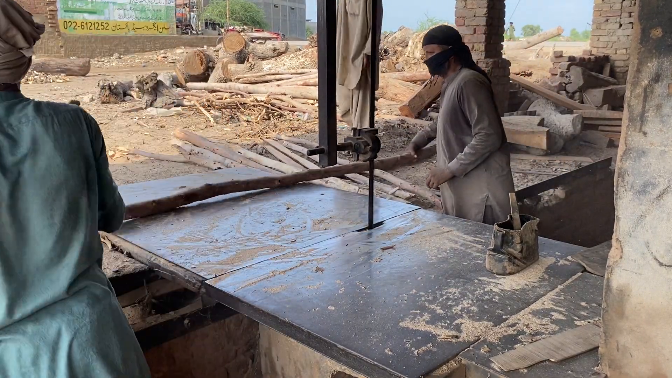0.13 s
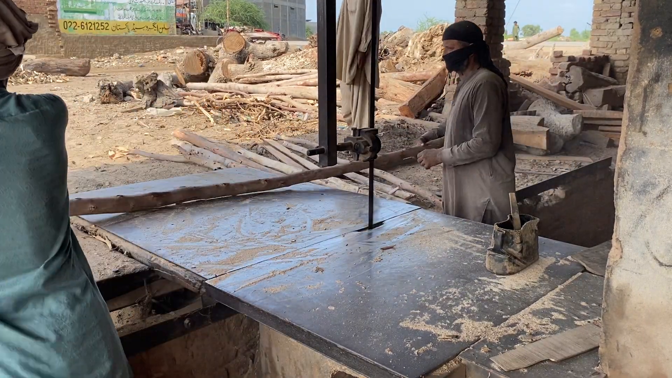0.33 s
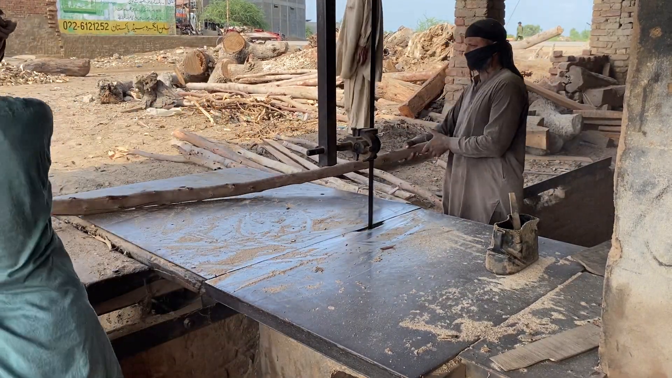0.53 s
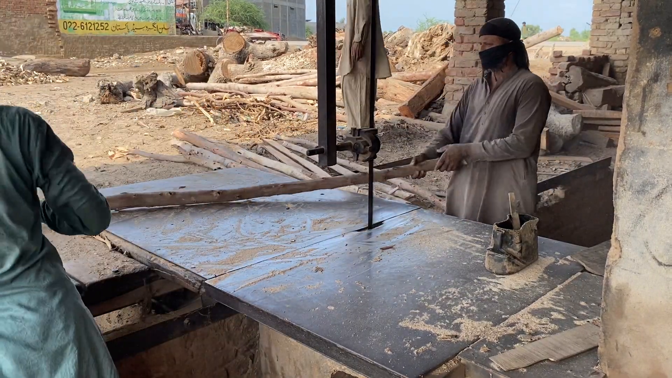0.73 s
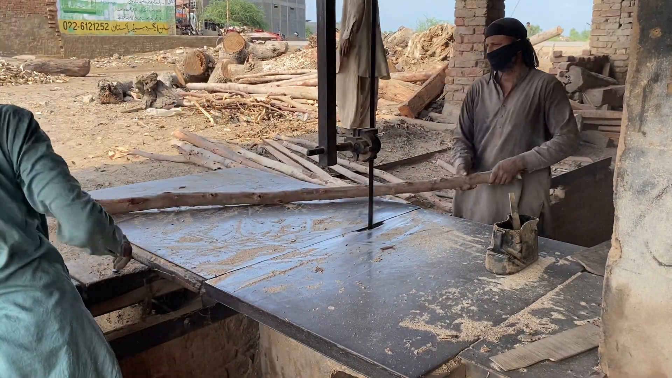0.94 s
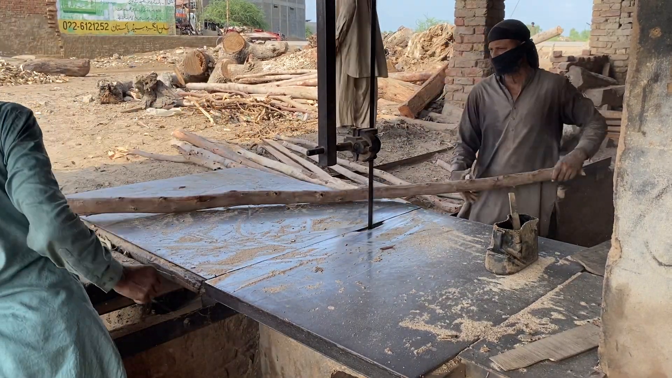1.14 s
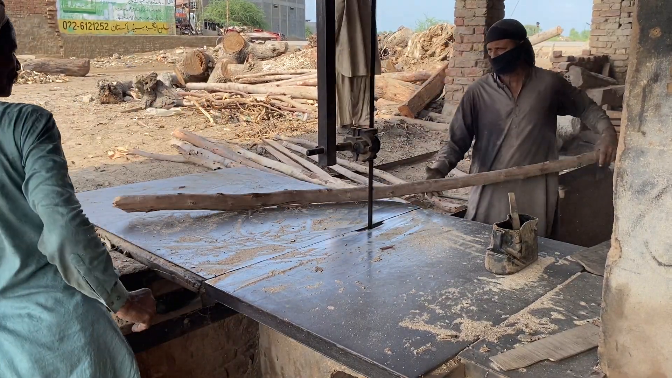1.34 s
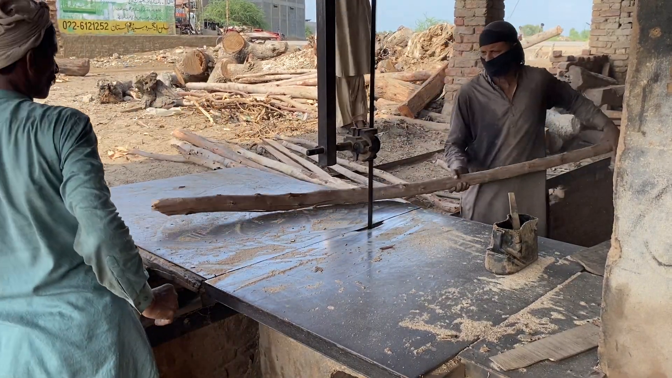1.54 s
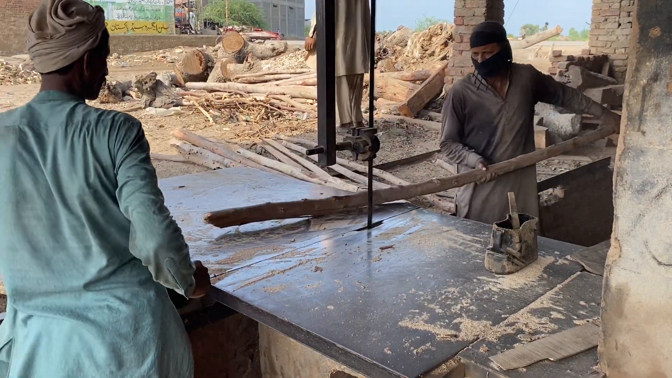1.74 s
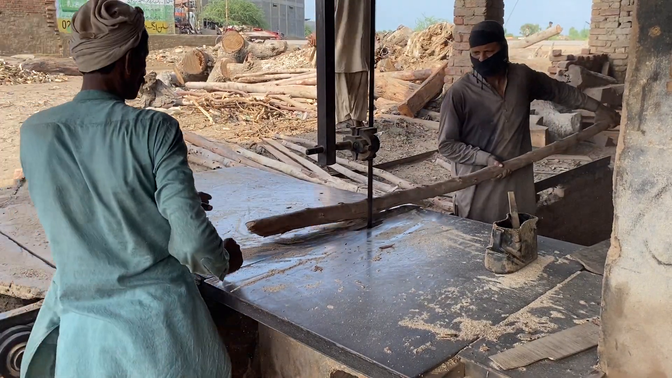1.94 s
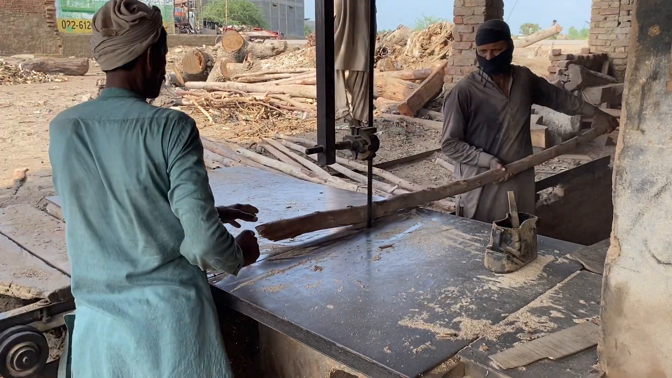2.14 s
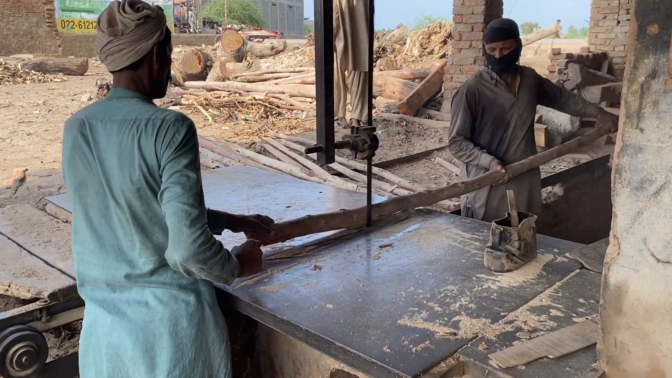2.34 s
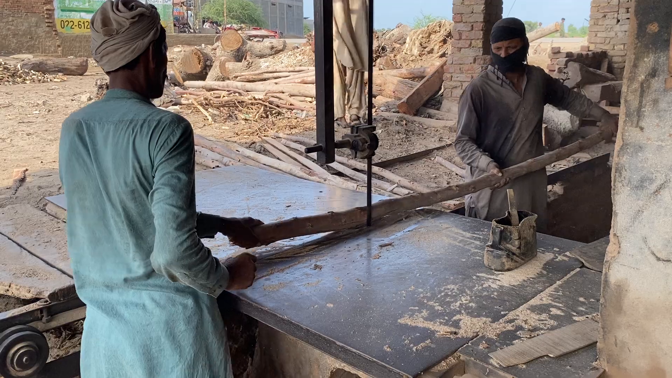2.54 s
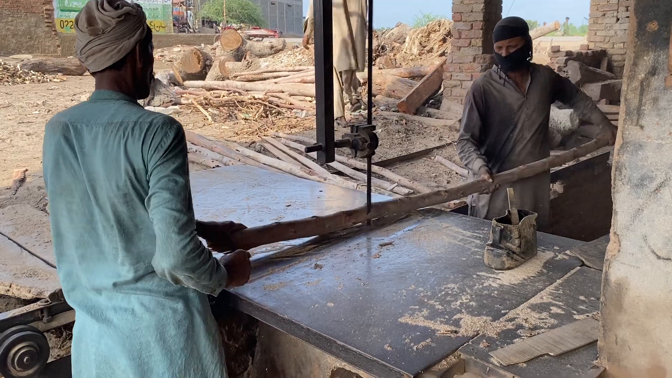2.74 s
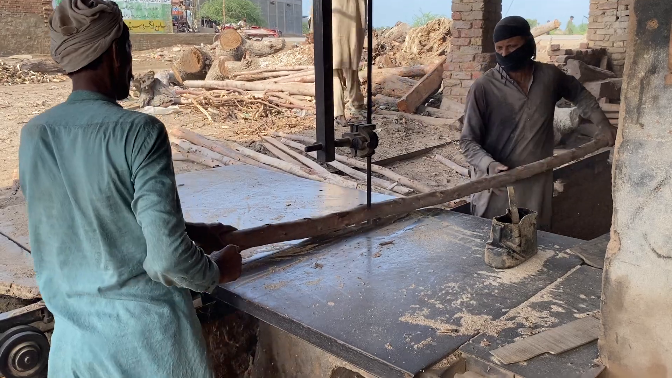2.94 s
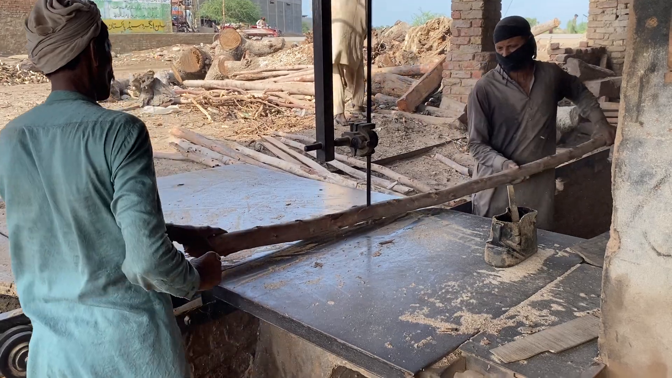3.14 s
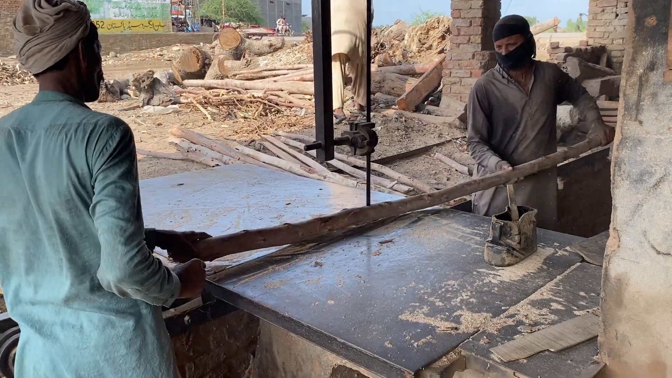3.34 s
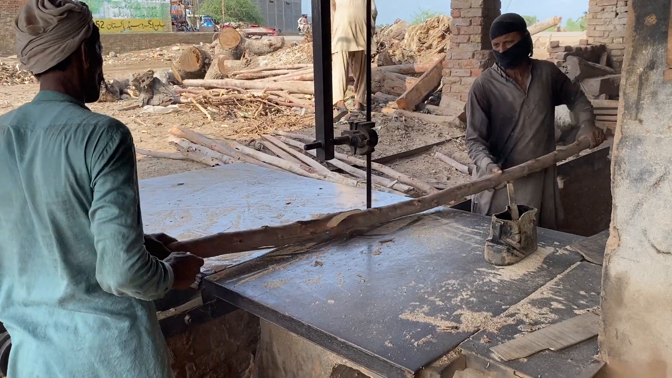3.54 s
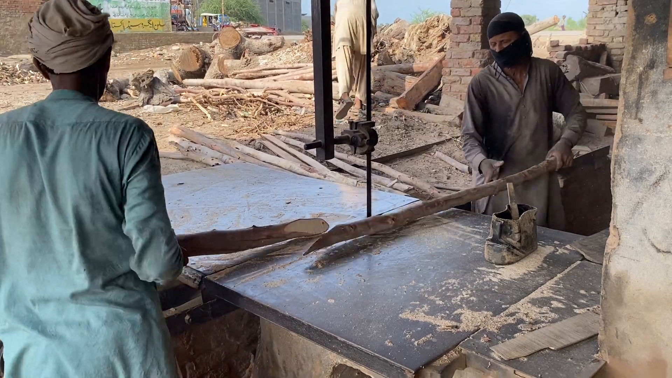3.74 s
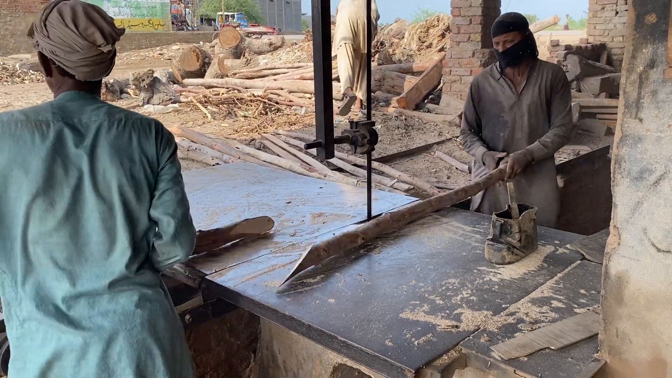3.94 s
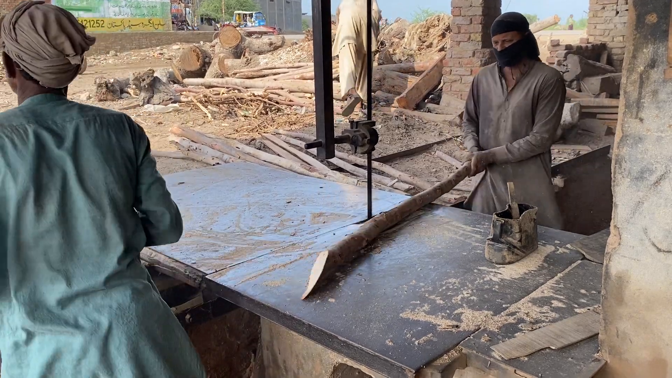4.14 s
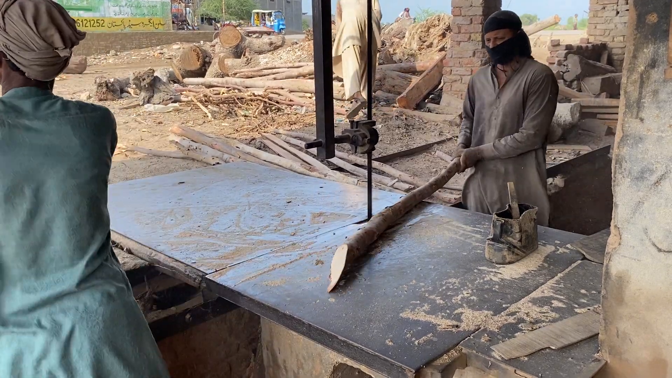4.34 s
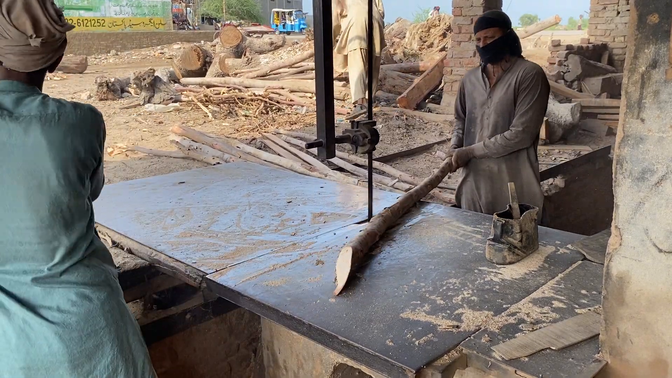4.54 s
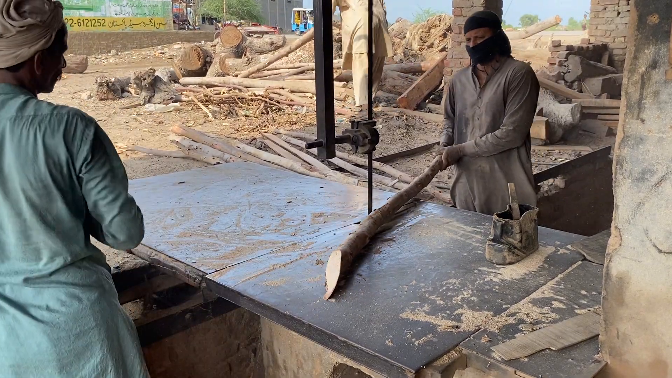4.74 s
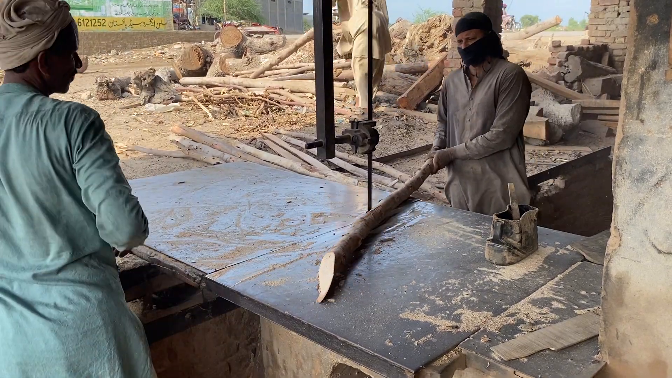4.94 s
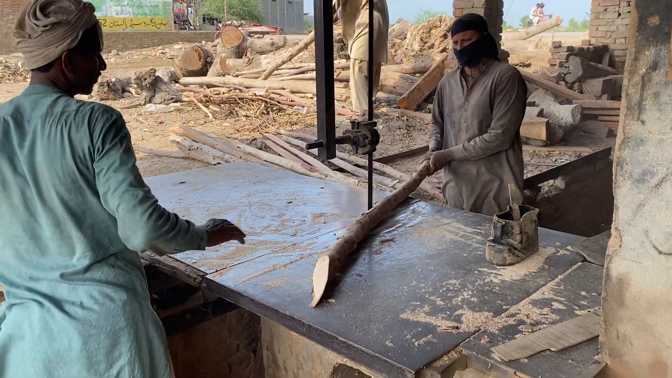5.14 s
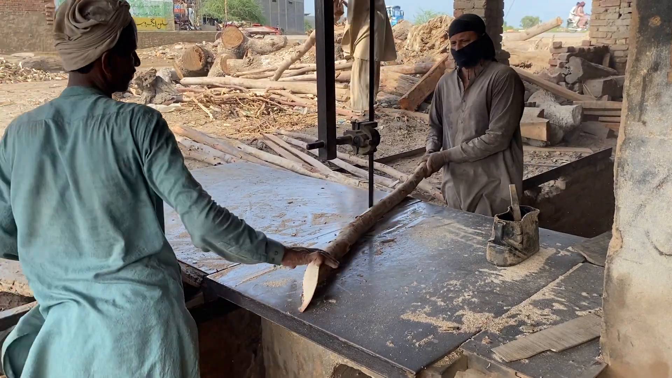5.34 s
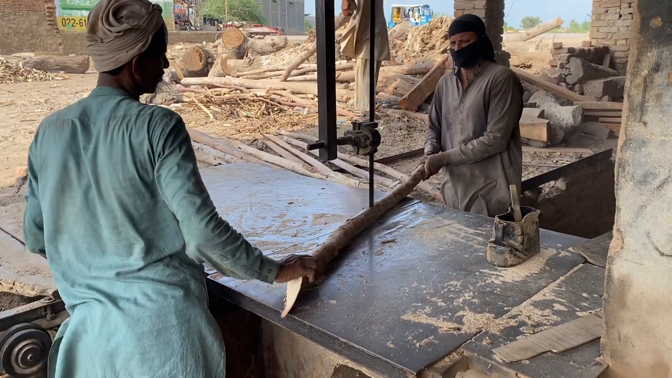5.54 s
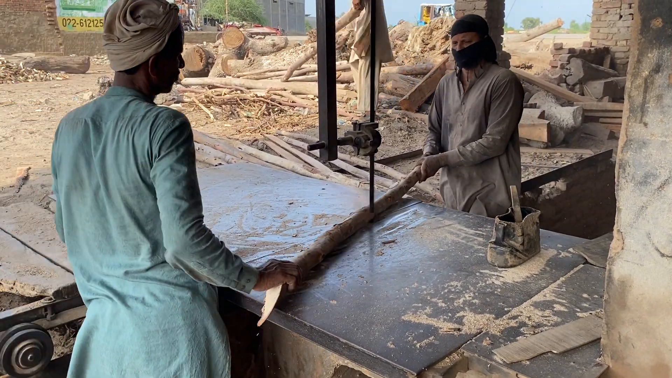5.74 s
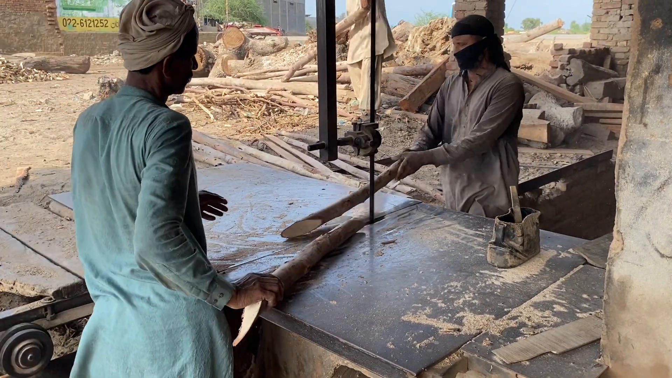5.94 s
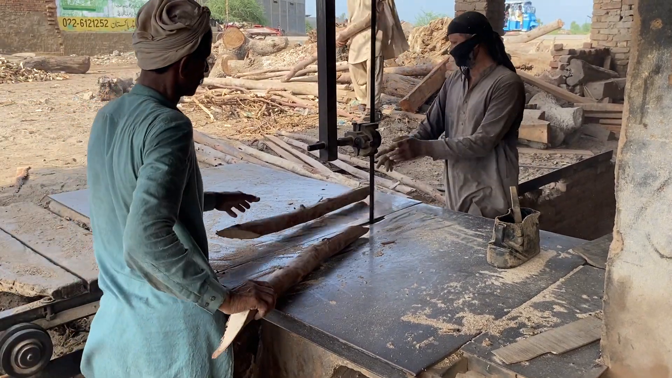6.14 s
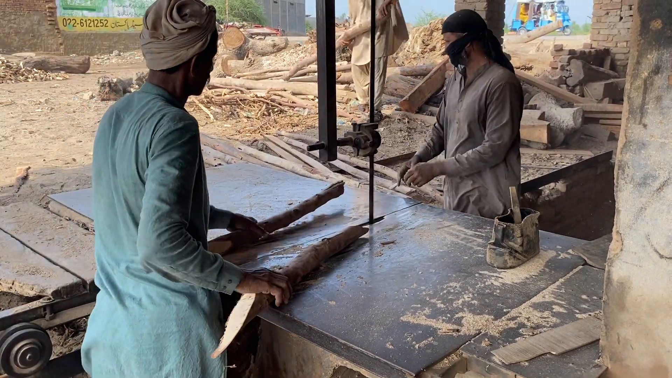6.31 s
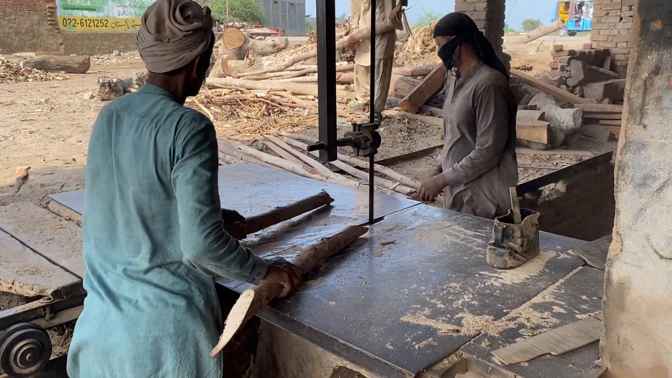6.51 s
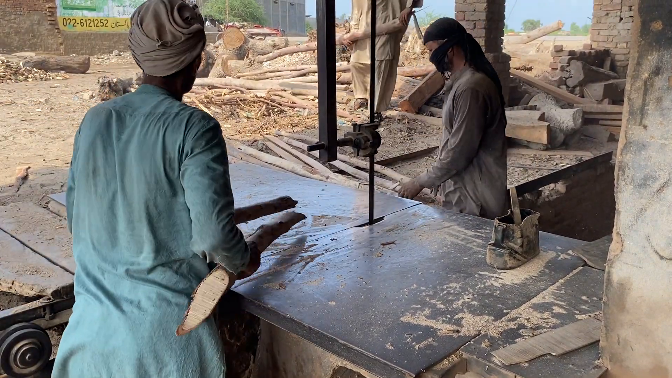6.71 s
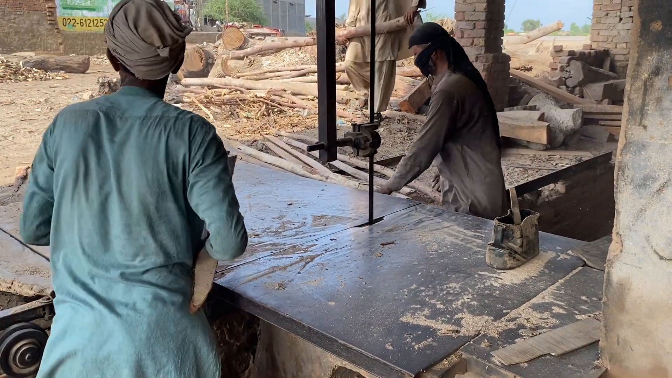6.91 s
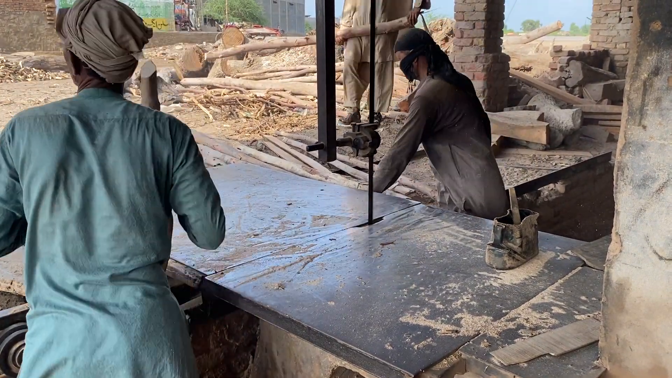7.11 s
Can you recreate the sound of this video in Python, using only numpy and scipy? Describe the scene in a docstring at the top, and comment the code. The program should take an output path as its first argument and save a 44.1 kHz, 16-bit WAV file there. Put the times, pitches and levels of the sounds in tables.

```python
"""A low rumble, a hiss and a thin whine: a band saw idles under the roof of an open sawmill.
Its wheels rumble, a bearing whines, and the blade hisses through its guides and pings once a turn.
Now and then timber knocks on the steel table. Twice a pole is pushed through: the blade screams,
wood rasps and sprays, teeth sing at their passing rate and the pole thrums on the table.
The two microphone ports hear the treble with a delay between them."""
import sys
import numpy as np
from scipy import signal
from scipy.fft import rfft, irfft, next_fast_len
from scipy.io import wavfile
from scipy.ndimage import uniform_filter1d, map_coordinates

SR = 44100
rng = np.random.default_rng(int(sys.argv[2]) if len(sys.argv) > 2 else 0)


def wrap_up_sound(samples):
    """Save the sound to the file named by the first command line argument, as 16-bit audio."""
    columns = np.atleast_2d(samples).T
    # keep every value between -1 and 1, then stretch to whole-number steps
    tamed = np.clip(columns, -1, 1)
    steps = np.round(tamed * 32767).astype(np.int16)
    wavfile.write(sys.argv[1], SR, steps)


N = 316197
TIME_S = np.arange(N) / SR
TURN_HZ = 4.409  # wheel rotation


def amp(db):
    """dB to gain."""
    return 10 ** (np.asarray(db) / 20)


def unit(x):
    """Scale to rms 1."""
    return x / np.sqrt(np.mean(x ** 2) + 1e-20)


def along(points, hz):
    """Interpolate (f/Hz, value) points on a log frequency axis."""
    f, v = np.transpose(points)
    return np.interp(np.log(hz + 1), np.log(f + 1), v)


def curves(*tables):
    """A gate, open within each table's time span, then each value column per sample."""
    times, *columns = np.transpose(np.vstack(tables))
    inside_s = [np.minimum(TIME_S - rows[0][0], rows[-1][0] - TIME_S) for rows in tables]
    gate = sum(np.clip(s / 0.018, 0, 1) for s in inside_s)
    return [gate] + [np.interp(TIME_S, times, column) for column in columns]


def wobble(rate_hz):
    """Smooth random curve through normal knots at rate_hz."""
    return map_coordinates(rng.standard_normal(int(N * rate_hz / SR) + 4), [TIME_S * rate_hz])


def phase_of(hz):
    """Running phase in rad."""
    return 2 * np.pi * np.cumsum(hz) / SR


def filtered(x, response):
    """Apply a complex frequency response."""
    size = next_fast_len(N + SR // 2)
    return irfft(rfft(x, size) * response(np.fft.rfftfreq(size, 1 / SR)), size)[..., :N]


def rush(spectrum, patchy_db, slides=()):
    """Two independent patchy noises; each slide (turn fractions, ratios) shifts a spectrum copy."""
    hz, t, bins = signal.stft(rng.standard_normal((2, N)), SR, nperseg=512)
    patches = uniform_filter1d(rng.standard_normal(bins.shape[1:]), size=6, axis=0)
    patches = unit(uniform_filter1d(patches, size=8, axis=1))
    closed = [(spectrum[0][0] / 2, -120), *spectrum, (spectrum[-1][0] * 2, -120)]
    ratios = [np.interp(t * TURN_HZ % 1, *slide) for slide in slides] or [np.ones(1)]
    colour = sum(amp(along(closed, hz[:, None] / ratio)) for ratio in ratios)
    _, noise = signal.istft(bins * amp(patchy_db * patches) * colour, nperseg=512)
    return unit(noise[:, :N])


# Background, dipping after each cut and then recovering: t/s, background level/dB, whine level/dB
BACKGROUND = [(0, -35.5, -45.5), (.6, -35.5, -46.5), (.9, -35, -43.5), (1.25, -34.5, -53),
              (1.7, -34.5, -43), (1.95, -34.5, -48), (2.1, -34.5, -52), (3.05, -35, -39), (3.5, -36.5, -44),
              (3.8, -38, -50), (4.1, -38, -46), (4.25, -35, -45.5), (4.85, -36, -50.5),
              (5.12, -35.5, -36.5), (5.35, -34, -52), (5.6, -35.5, -56), (5.83, -36.5, -41),
              (5.92, -37.5, -57), (6.45, -36, -43.5), (7.17, -36, -55)]
USUAL_BACKGROUND_DB = -35.5


def background_offset_db():
    """Background level relative to its usual value."""
    _, background_db, _ = curves(BACKGROUND)
    return background_db - USUAL_BACKGROUND_DB


def bearing_whine():
    """A bearing whines on one wavering tone."""
    _, _, whine_db = curves(BACKGROUND)
    tone = np.sqrt(2) * np.sin(phase_of(1766 + 4 * wobble(20)))
    return amp(whine_db + 2.5 * wobble(14)) * tone * [[1], [.6]]


# Wheel rumble spectrum: f/Hz, relative density/dB
RUMBLE = [(15, -61), (25, -31), (34, -53), (47, -10), (92, -5), (123, -1), (167, -1), (199, -6.5),
          (247, -2), (503, -16.5), (549, -20), (800, -19.5), (1040, -15), (1760, -120)]
# Hum bands: f/Hz, width/Hz, relative level/dB
HUMS = [(123.3, 14.6, -43.5), (170.8, 4.8, -45.5), (71.9, 4.9, -47.5), (245, 15.4, -49.5), (889, 39, -48),
        (1640, 20, -50.5), (2044, 31, -46)]
RUMBLE_DB, HUMS_DB, RUMBLE_SWING_DB_PER_DB = -36, -41, 1.82


def wheel_rumble():
    """The wheels rumble with narrow hums; both follow the background level."""
    def bands(hz):
        return sum(amp(db) / np.sqrt(width) / (1 + 2j * (hz - centre) / width) ** 2
                   for centre, width, db in HUMS)
    rumble = unit(filtered(rng.standard_normal((2, N)), lambda hz: amp(along(RUMBLE, hz))))
    hums = unit(filtered(rng.standard_normal((2, N)), bands))
    swing = amp(RUMBLE_SWING_DB_PER_DB * background_offset_db())
    return swing * (amp(RUMBLE_DB) * rumble + amp(HUMS_DB) * hums)


# Frame and table resonances: f/Hz, relative density/dB
FRAME = [(320, -6.5), (550, -10), (741, -14.5), (925, 0), (1100, -12.5), (1250, -10.5), (1510, -7),
         (1800, 0), (1920, -2.5), (2100, -3.5), (2570, -5), (4950, -10.5), (5500, -9.5), (7150, -44),
         (12100, -120)]
FRAME_DB = -36


def frame_ring():
    """Frame and table ring as the saw runs."""
    return amp(FRAME_DB + background_offset_db() + 0.37 * wobble(8)) * rush(FRAME, patchy_db=1.0)


# Spectra of the free blade, the loaded blade and two narrow modes: f/Hz, relative density/dB
HISS = [(4500, -35), (5750, -11), (6050, -1.5), (6400, 1), (7300, -0.5), (8500, -4), (10000, -6.5),
        (12500, -6.5), (13500, -8.5), (13900, -5), (14600, -6), (17500, -5)]
SCREAM = [(4000, -13), (5750, -12.5), (6050, 0), (6400, -0.5), (7300, 1), (8500, -4.5), (10000, -8),
          (12500, -8), (13500, -11), (13900, -4.5), (14600, 1), (17500, -22.5)]
BLADE_MODES = [(5800, -30), (5930, 0), (6070, 0), (6200, -30), (13500, -30), (13850, -2.5), (14150, -2.5),
               (14500, -30)]
# Slide of the blade's cross modes: position/turn, falling pitch ratio, rising pitch ratio
MODE_SLIDE = [(0, 1, 1.07), (.1, 1, 1.06), (.3, .99, 1), (.42, .975, .975), (.54, .955, .99), (.6, .905, 1),
              (.67, .905, 1.015), (.77, 1, 1.035), (1, 1, 1.07)]
# One table per cut: t/s, scream level/dB, chip level/dB, rasp level/dB, wood resonance f/Hz
CUTS = [
    [(2.26, -40, -48, -54, 2500), (2.316, -25.5, -36, -26, 2490), (2.385, -34, -45, -42, 2600),
     (2.43, -21.5, -37, -28.5, 2470), (2.584, -23, -38, -30, 2360), (2.66, -22, -21, -24.5, 3030),
     (2.74, -19, -35, -26.5, 3730), (2.79, -25, -25, -30, 2000), (2.85, -23, -22, -25.5, 1300),
     (2.96, -22, -26, -26.5, 1340), (3.066, -22, -21.5, -26, 1800), (3.13, -23.5, -24, -27.5, 1900),
     (3.16, -26, -25.5, -28, 1900), (3.35, -25, -27, -30, 2320), (3.43, -26.5, -30, -28.5, 2300),
     (3.5, -27, -25, -27, 2160), (3.55, -36, -48, -62, 2300)],
    [(4.9, -49, -46, -43, 1900), (4.945, -22.5, -30, -36.5, 1900), (5.058, -22.5, -24.5, -33.5, 2100),
     (5.3, -24.5, -24.5, -33, 2070), (5.5, -24.5, -28, -32.5, 1720), (5.634, -28.5, -28, -35, 1800),
     (5.72, -28, -25.5, -37, 2500), (5.754, -23, -27, -27, 2200), (5.8, -31.5, -40, -57, 2900),
     (5.85, -32, -42, -55, 2900)],
]
HISS_DB, HISS_SWING_DB_PER_DB = -30, 0.62


def blade(chatter_db):
    """The blade hisses in its guides and screams in the wood; its modes slide once a wheel turn."""
    turn, falling, rising = np.transpose(MODE_SLIDE)
    gate, scream_db, *_ = curves(*CUTS)
    free = amp(HISS_DB + HISS_SWING_DB_PER_DB * background_offset_db() + 0.54 * wobble(15))
    loaded = gate * amp(scream_db + chatter_db)
    broad_slide = [(turn, 1 + .7 * (falling - 1))]
    hiss = free * rush(HISS, patchy_db=1.7, slides=broad_slide)
    scream = loaded * rush(SCREAM, patchy_db=0.94, slides=broad_slide)
    modes = rush(BLADE_MODES, patchy_db=1.5, slides=[(turn, falling), (turn, rising)])
    return hiss + scream + amp(-9) * np.hypot(free, loaded) * modes


PING_HZ, PING_AT_TURN, PING_HALF_WIDTH_S, PING_DB = 5400, .68, .014, -45


def blade_ping():
    """The blade pings once a wheel turn, at a varying level."""
    from_peak_s = (TIME_S * TURN_HZ % 1 - PING_AT_TURN) / TURN_HZ
    pulse = np.exp(-(from_peak_s / PING_HALF_WIDTH_S) ** 2)
    tone = np.sqrt(2) * np.sin(phase_of(PING_HZ + 60 * wobble(120)))
    return amp(PING_DB + background_offset_db() + 3 * wobble(TURN_HZ)) * pulse * tone * [[1], [.4]]


# Blows: t/s, level/dB, favoured f/Hz
KNOCKS = [(.814, -21.5, 780), (.835, -21, 1860), (.842, -24.5, 1060), (.86, -34, 483), (.909, -26, 1060),
          (0.923, -31.5, 560), (6.142, -29, 500), (6.159, -26, 930), (6.249, -38, 398)]
# Timber modes: f/Hz, relative level/dB, T60/s
TIMBER_MODES = [(257, 2, 0.11), (422, 4.5, 0.14), (560, 3, 0.079), (782, -4.5, 0.15), (1048, -2, 0.082),
                (1390, -11, .06), (1800, -3, 0.043), (1920, 5, 0.035), (2330, -11, .04), (2750, 11, .04)]


def timber_knocks():
    """Timber drops on the table: each blow favours the modes near one pitch, over a dull clatter."""
    out, t = np.zeros((2, N + SR)), np.arange(SR // 4) / SR
    attack = 1 - np.exp(-t / 0.0017)
    for start_s, blow_db, favoured_hz in KNOCKS:
        ring = 0
        for hz, mode_db, t60 in TIMBER_MODES:
            level_db = mode_db - 33 * abs(np.log2(hz / favoured_hz)) - 60 * t / t60
            ring += amp(level_db) * np.sin(2 * np.pi * (hz * t + rng.random()))
        noise = uniform_filter1d(rng.standard_normal((2, len(t))), size=5)
        clatter = 1.5 * amp(-60 * t / 0.2) * uniform_filter1d(noise, size=int(SR / 2.5 / favoured_hz))
        start = round(start_s * SR)
        out[:, start:start + len(t)] += amp(blow_db) * attack * (ring * [[1], [.5]] + clatter)
    return out[:, :N]


# Spectra of the chip spray and three rasp bands: f/Hz, relative density/dB
CHIPS = [(7000, -24), (8500, 1.5), (11000, -2), (13000, 0.5), (15800, 5)]
LOW_RASP = [(450, -8), (750, -5), (950, 2.5), (1100, 1.5), (1350, -0.5), (1500, 2.5), (1750, -38)]
MIDDLE_RASP = [(1300, -29), (1600, 0.5), (1900, -1.5), (2300, -4), (2600, -20)]
HIGH_RASP = [(1900, -12), (2400, 0.5), (3200, -1), (4000, -0.5), (5000, -3.5), (5800, -4.5)]
RASPS_HZ, RASPS_DB, RASP_LOSS_DB_PER_OCTAVE = (1090, 1900, 3270), (-3, -4, 1.5), 5.5


def chips_and_rasp(chatter_db):
    """Chips tear off in bursts; the wood rasps most near its resonance."""
    gate, _, chip_db, rasp_db, wood_hz = curves(*CUTS)
    out = amp(chip_db) * rush(CHIPS, patchy_db=3.5)
    for spectrum, hz, band_db in zip((LOW_RASP, MIDDLE_RASP, HIGH_RASP), RASPS_HZ, RASPS_DB):
        loss_db = RASP_LOSS_DB_PER_OCTAVE * abs(np.log2(hz / wood_hz))
        out += amp(rasp_db + band_db - loss_db) * rush(spectrum, patchy_db=3.5)
    return gate * amp(chatter_db) * out


# Tooth harmonics 1-6: level/dB re rasp
HARMONICS_DB = -25, -21, -17, -17, -18, -18
# Single harmonics ringing out: centre t/s, length/s, harmonic number, peak level/dB
RINGS = [(2.32, .07, 4, -39), (2.32, .07, 5, -39), (2.57, .32, 3, -37), (2.69, .1, 4, -33),
         (2.68, .1, 5, -34.5), (2.7, .14, 6, -35), (2.85, .14, 1, -40), (2.9, .27, 2, -37),
         (3.15, .45, 3, -39), (3.33, .42, 4, -38.5), (5.06, .15, 1, -46), (5.33, .25, 1, -45),
         (5.58, .15, 3, -44), (5.66, .15, 1, -46), (5.72, .14, 4, -43)]
TOOTH_HZ, SWELL_DB = 630.6, 2.5


def tooth_song():
    """Evenly spaced teeth strike the wood: flickering harmonics of their rate, some ringing out."""
    gate, _, _, rasp_db, _ = curves(*CUTS)
    phase = phase_of(TOOTH_HZ + 2 * wobble(8) + 4 * wobble(60))
    song = 0
    for k, harmonic_db in enumerate(HARMONICS_DB, 1):
        held = gate * amp(rasp_db + harmonic_db + SWELL_DB * wobble(8.9))
        rings = sum(amp(db) * np.clip(1 - (2 * (TIME_S - centre_s) / length_s) ** 2, 0, 1)
                    for centre_s, length_s, harmonic, db in RINGS if harmonic == k)
        flicker = amp(3 * wobble(50))
        jitter_rad = (.9 + .1 * k) * wobble(60)
        song += (held + rings) * flicker * np.cos(k * phase + jitter_rad)
    return np.sqrt(2) * song * [[1], [.6]]


# Pole vibration: start t/s, full t/s, end t/s, upper mode level/dB, lower mode level/dB, end sag/dB
THRUMS = [(2.76, 2.85, 3.475, -30, -33.5, -2.5), (5.1, 5.4, 5.7, -35, -29, -5)]
POLE_HZ, THROB_DB, THROB_PEAK_TURN = (152, 120), (2, 0.5), (0.82, 0.81)  # upper, lower mode
THRUM_RELEASE_S = .03


def pole_thrum():
    """The teeth shake the pole on the table: two bending modes throb with the wheel."""
    out = 0
    for mode, hz in enumerate(POLE_HZ):
        held = 0
        for start, full, end, *modes_db, sag_db in THRUMS:
            envelope = np.interp(TIME_S, [start, full, end, end + THRUM_RELEASE_S], [0, 1, amp(sag_db), 0])
            held += amp(modes_db[mode]) * envelope
        throb_db = THROB_DB[mode] * np.cos(2 * np.pi * (TIME_S * TURN_HZ - THROB_PEAK_TURN[mode]))
        tone = np.sin(phase_of(hz + 8 * wobble(30)))
        flicker = amp(2 * wobble(20) + 2.5 * wobble(60))
        out += held * amp(throb_db) * unit(tone * flicker)
    return out * [[1], [.7]]


# Left-right likeness of the sound, nearly identical in the treble: f/Hz, likeness (0-1)
LIKENESS = [(60, 0.98), (200, 0.97), (500, 0.71), (1000, 0.56), (1500, 0.61), (2500, 0.73), (3900, 0.99),
            (5000, 0.8), (6800, 0.85), (8000, 1), (9050, 1), (10100, 1), (11150, .99), (12300, 0.99),
            (13270, .99), (14400, .9), (15400, .99)]
# Phase between channels: f/Hz, left lead/rad
LEAD = [(0, 0), (1000, -.1), (2000, 0), (3360, .4), (3880, 0), (6900, 0), (9050, -3.14), (11150, -6.28),
        (13270, -9.42), (15400, -12.56), (16500, -12.6)]
# Balance: f/Hz, left minus right level/dB
BALANCE = [(60, -1.5), (180, 2), (550, -1.0), (1650, -0.5), (4970, 1), (15000, -0.5)]


def stereo_image(hz):
    """Response matrix from a source's shared and unshared rows to left and right."""
    angle = np.arccos(np.clip(along(LIKENESS, hz), -1, 1)) / 2
    shared, unshared = np.cos(angle), np.sin(angle)
    # each side takes half of the balance and lead
    half = amp(along(BALANCE, hz) / 2) * np.exp(.5j * np.interp(hz, *np.transpose(LEAD)))
    return np.array([[shared * half, unshared * half], [shared / half, -unshared / half]])


def scene():
    """Sum the sources, each a shared and an unshared row, and mix them to left and right."""
    chatter_db = 0.84 * wobble(70) + wobble(400)  # chip bursts, common to scream, spray and rasp
    saw = bearing_whine() + wheel_rumble() + frame_ring() + blade(chatter_db) + blade_ping()
    wood = timber_knocks() + chips_and_rasp(chatter_db) + tooth_song() + pole_thrum()
    return filtered((saw + wood)[None], stereo_image).sum(axis=1)


BAND_LIMIT_HZ = 15780


def record(dry):
    """Brick-wall low-pass."""
    return filtered(dry, lambda hz: hz < BAND_LIMIT_HZ)


dry = scene()
out = record(dry)
wrap_up_sound(out)
```